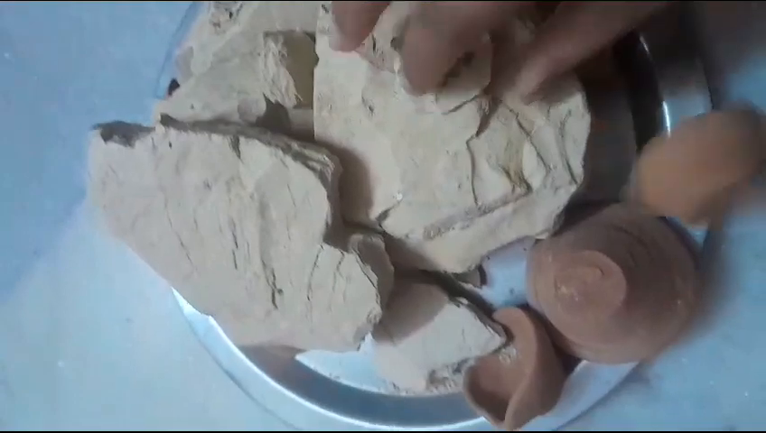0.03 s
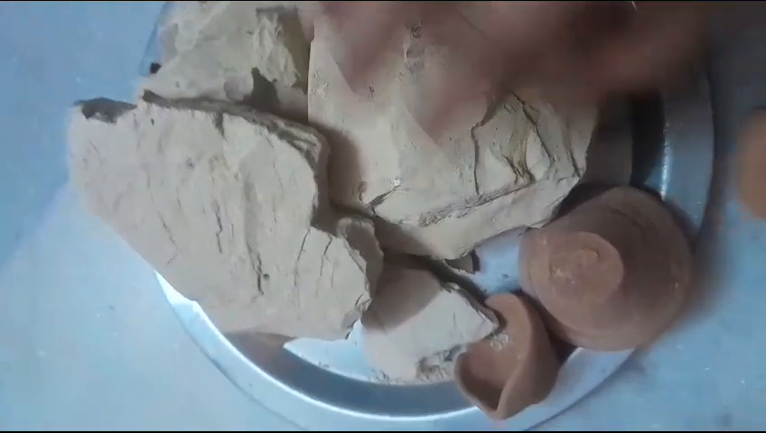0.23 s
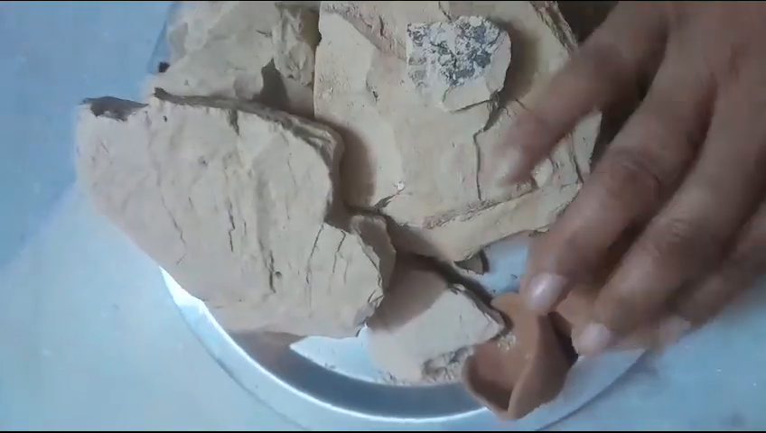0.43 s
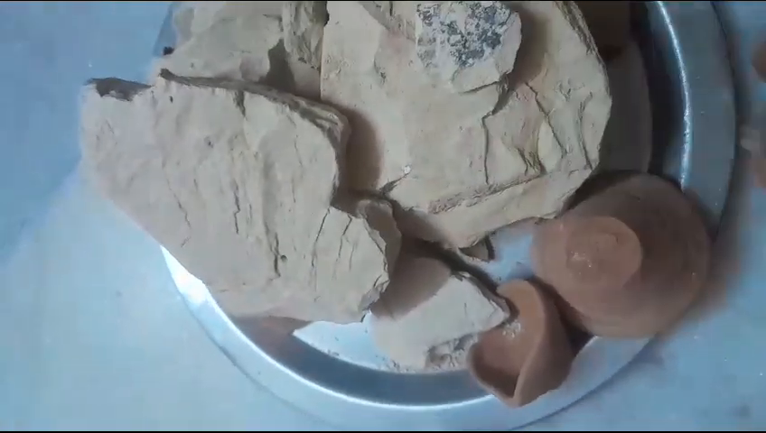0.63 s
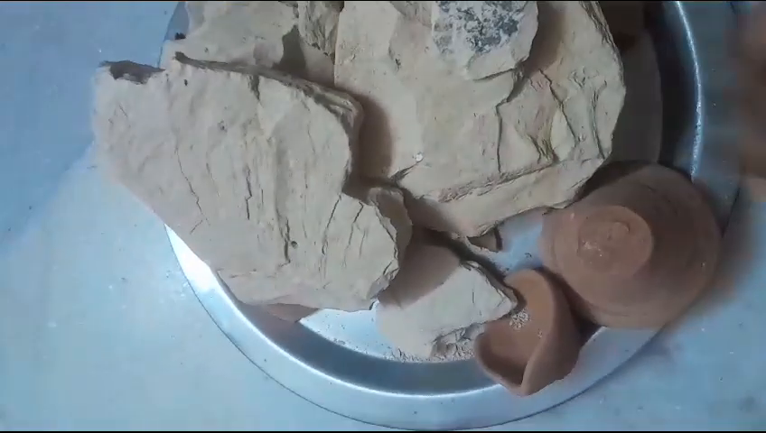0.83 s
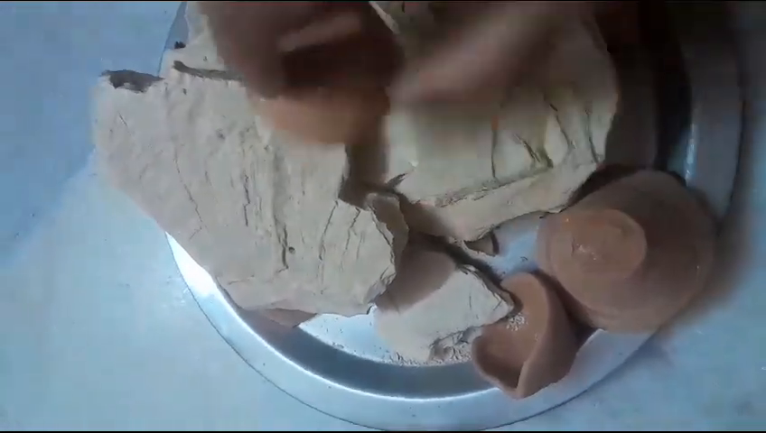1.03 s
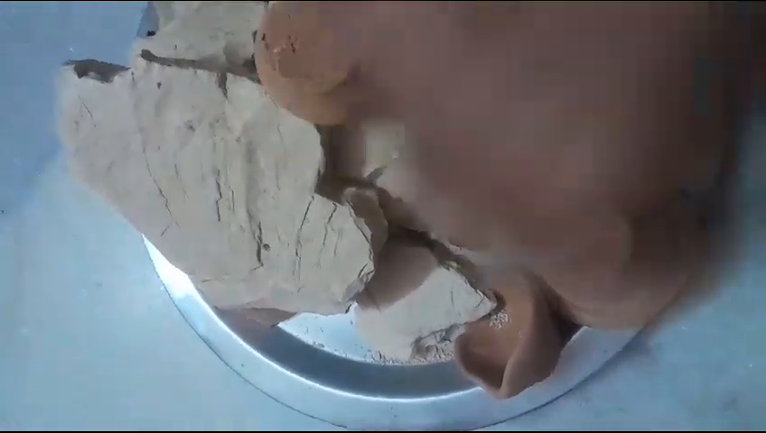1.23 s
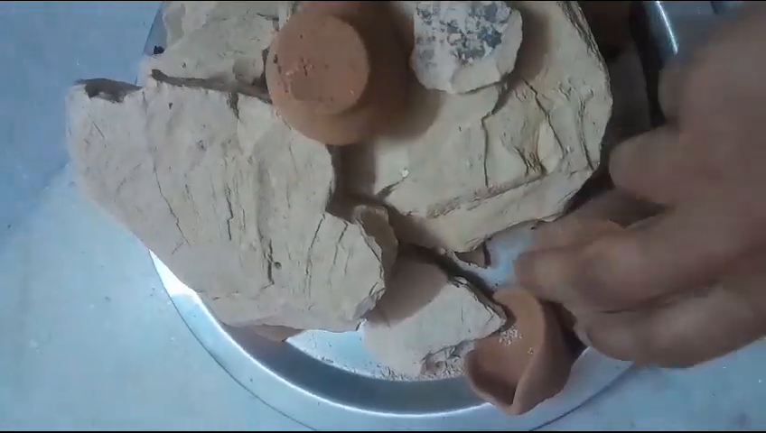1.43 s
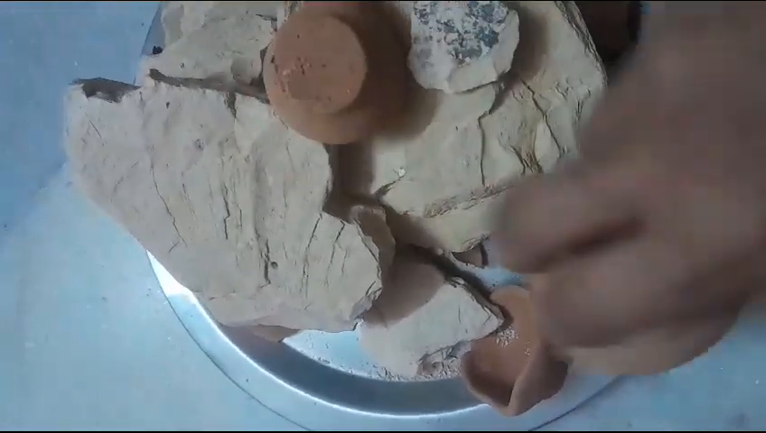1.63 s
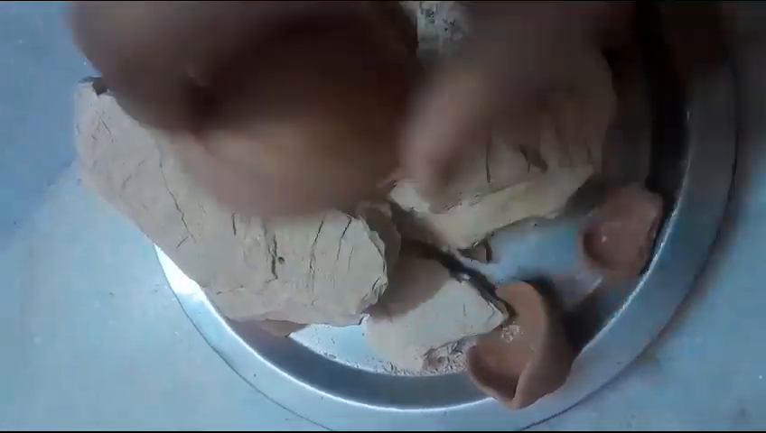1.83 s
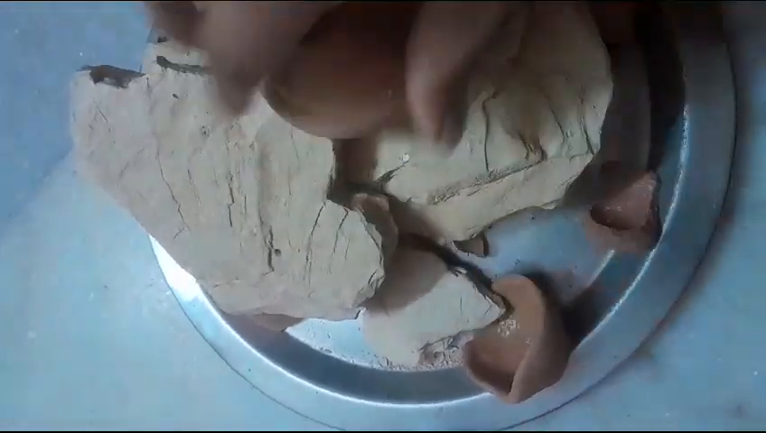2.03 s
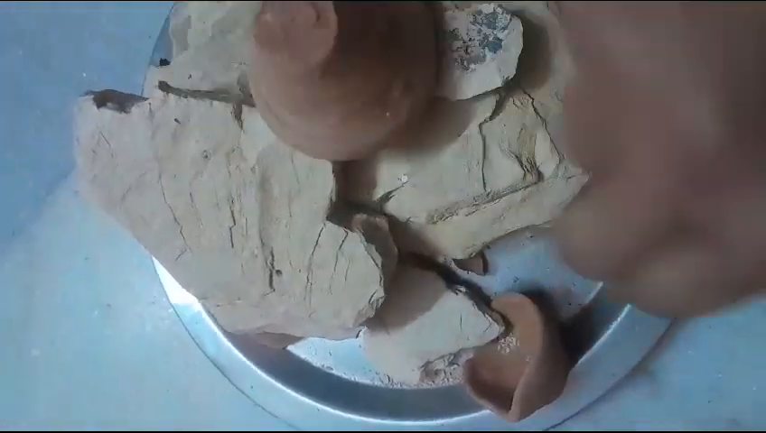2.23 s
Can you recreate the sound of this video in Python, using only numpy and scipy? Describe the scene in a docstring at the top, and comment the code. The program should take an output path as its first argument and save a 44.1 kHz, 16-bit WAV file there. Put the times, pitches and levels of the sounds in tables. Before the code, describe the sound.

Close, irregular clacks of little clay pots landing on dry clay slabs. One clinks against a steel tray rim early on; scattered taps, short scrapes and more knocks follow, with soft tray bumps and a brief hard-room echo.

```python
"""Short gritty clacks over dull thuds: small clay pots set down on dry clay slabs in a steel tray, close by.
Some knocks ring the pot, and a pot clinks as it tips against the steel rim.
Clay scrapes and rubs on clay, crumbs are crushed, and the tray bumps softly under the weight.
A bare, hard room answers over a faint low rumble."""
import sys
import numpy as np
from scipy import signal
from scipy.fft import rfft, irfft, next_fast_len
from scipy.io import wavfile

SR = 44100
rng = np.random.default_rng(int(sys.argv[2]) if len(sys.argv) > 2 else 0)


def master_out(mix):
    """Clip the mix to full scale and print it as 16-bit PCM to the path in sys.argv[1]."""
    frames = np.transpose(np.atleast_2d(mix))
    ceiling = np.clip(frames, -1, 1)
    pcm = np.round(ceiling * 32767).astype(np.int16)
    wavfile.write(sys.argv[1], SR, pcm)


N = 101429
LEAD_S, BLOW_S, REF_S = 0.2, 0.16, 0.01
BANDS_HZ = 31.25 * 2 ** (np.arange(28) / 3)
COHERENT_BELOW_HZ = 1400
# Stereo balance of the contacts: freq_hz, left_minus_right_db
BALANCE = [(100, -13.5), (300, 0), (550, -0.5), (1100, 3.5), (2200, -2), (4000, -2), (8000, 0.5),
           (14000, -3)]


def undb(db):
    """Decibels to gain."""
    return 10 ** (np.asarray(db) / 20)


def curve(points, hz):
    """Read a table on a log-frequency axis."""
    p = np.array(points)
    return np.interp(np.log(hz), np.log(p[:, 0]), p[:, 1])


def fade(t, t60_s):
    """Exponential decay."""
    return np.exp(-np.log(1000) * t / t60_s)


def unit(x):
    """Scale each channel to unit energy."""
    return x / np.sqrt(np.sum(x ** 2, axis=-1, keepdims=True) + 1e-20)


def panned(pan_db):
    """Constant-power gains; pan_db is left minus right."""
    gains = undb(np.array([[pan_db], [-pan_db]]) / 2)
    return gains / np.sqrt(np.mean(gains ** 2))


def band(hz, size, coherent_hz):
    """A third-octave of stereo noise, alike in both channels below coherent_hz."""
    bins_hz = np.fft.rfftfreq(size, 1 / SR) + 1e-3
    shape = np.cos(np.pi / 2 * np.clip(3 * np.log2(bins_hz / hz), -1, 1))
    mid, side = irfft(rfft(rng.standard_normal((2, size))) * shape, size)
    coherence = 1 / (1 + (hz / coherent_hz) ** 2)
    return np.sqrt(1 + coherence) * mid + np.sqrt(1 - coherence) * side * np.array([[1], [-1]])


def add(out, start_s, sound, level_db):
    """Mix in a sound; for unit energy, level_db is its power spread over REF_S."""
    i = int((start_s + LEAD_S) * SR)
    part = sound[:, :out.shape[1] - i]
    out[:, i:i + part.shape[1]] += part * undb(level_db) * np.sqrt(REF_S * SR)


def ring(t, modes, pan_db, roughness=0):
    """Decaying modes; grinding contact widens each by roughness times its frequency."""
    out = 0
    attack = 1 - np.exp(-t / 0.00041)
    for hz, db, t60_s in modes:
        stereo_phase = np.array([[1], [-1]]) * rng.choice([-1, 1]) * min(hz / COHERENT_BELOW_HZ, 1) * 0.6
        wander = np.cumsum(rng.standard_normal(len(t))) * np.sqrt(2 * np.pi * roughness * hz / SR)
        wave = np.sin(2 * np.pi * hz * t + stereo_phase + wander + rng.uniform(0, 2 * np.pi))
        out += undb(db) * wave * fade(t, t60_s) * attack * panned(pan_db + curve(BALANCE, hz))
    return out / np.sqrt(np.sum(out ** 2) / 2)


# Background spectrum: freq_hz, band_level_db
RUMBLE_SPECTRUM = [(30, -102), (45, -85.5), (62, -78), (85, -87.5), (125, -82), (160, -70), (200, -72.5),
                   (260, -82), (600, -92.5), (2000, -84.5), (6000, -93), (15000, -101)]
def rumble():
    """Faint steady background of the room."""
    size = next_fast_len(N)
    noise = sum(undb(curve(RUMBLE_SPECTRUM, hz)) * unit(band(hz, size, 400)) for hz in BANDS_HZ)
    return noise[:, :N] * np.sqrt(size) * panned(-5.5)


# Room tail decay: freq_hz, t60_s
TAIL_DECAY = [(150, 0.55), (500, 0.34), (1000, 0.32), (2200, 0.36), (4000, 0.26), (8000, 0.31),
              (15000, 0.29)]
# Room tail spectrum: freq_hz, gain_db
TAIL_SPECTRUM = [(150, -2.5), (500, -9), (1000, -9), (2200, -8.5), (4000, -5.5), (8000, -9), (15000, -9.5)]
def room(dry):
    """Quick reflections from tray and floor, then the diffuse tail of hard walls."""
    early_db, early_t60_s = -10.5, 0.042
    t = np.arange(SR) / SR
    tail_rise = 1 - np.exp(-t / 0.019)
    early_rise = 1 - np.exp(-(t / 0.00033) ** 2)
    response = 0
    for hz in BANDS_HZ:
        tail = unit(band(hz, SR, 730) * fade(t, curve(TAIL_DECAY, hz)) * tail_rise)
        early = unit(band(hz, SR, 1000) * fade(t, early_t60_s) * early_rise)
        width_gain = np.sqrt(0.46 * hz / SR)
        response += width_gain * (undb(curve(TAIL_SPECTRUM, hz)) * tail + undb(early_db) * early)
    return signal.fftconvolve(dry, response, axes=1)[:, :dry.shape[1]]


# Light rubs: start_s, length_s, level_db, centre_hz, width_octaves
RUBS = [(.425, .09, -64.5, 12450, .35), (1.394, 0.081, -71, 6600, .12)]
def rubs(out):
    """A pot or hand brushes dry clay: a thin friction hiss that swells and fades."""
    for start_s, length_s, level_db, centre_hz, width_octaves in RUBS:
        size = int(length_s * SR)
        bins_hz = np.fft.rfftfreq(size, 1 / SR) + 1
        shape = np.exp(-(np.log2(bins_hz / centre_hz) / width_octaves) ** 2)
        hiss = irfft(rfft(rng.standard_normal((2, size))) * shape, size)
        swell = np.sin(np.pi * np.arange(size) / size)
        add(out, start_s, unit(hiss * swell), level_db)


# Tray bumps: start_s, level_db
BUMPS = [(0.101, -60.5), (0.282, -55.5), (0.734, -61), (1.634, -58), (1.715, -61), (1.975, -55)]
def tray_bumps(out, t):
    """The tray takes the weight of a pot and sounds one low mode."""
    pitch_hz, t60_s = 64.4, 0.28
    for start_s, level_db in BUMPS:
        add(out, start_s, ring(t, [(pitch_hz, 0, t60_s)], pan_db=-0.5), level_db)


# Crushed crumbs: start_s, level_db, t60_s
CRUMBS = [(.731, -46.5, 0.13), (1.1151, -44, 0.026), (1.502, -53.5, .15), (1.523, -43, 0.35)]
# Fizz spectrum: freq_hz, band_gain_db
FIZZ_SPECTRUM = [(3000, -30.5), (6500, 6), (9500, -3), (13500, 4), (16000, -12)]
def crumbs(out, t, noise):
    """Dry crumbs break under a pot in a brief, uneven fizz."""
    spread_db, grain_s = 5.5, 0.00033
    grain_index = np.arange(len(t)) // int(grain_s * SR)
    gains = undb(curve(FIZZ_SPECTRUM, BANDS_HZ))
    for start_s, level_db, t60_s in CRUMBS:
        i = rng.integers(SR - len(t))
        fizz = sum(gain * unit(hiss[:, i:i + len(t)]) for gain, hiss in zip(gains, noise))
        grains = undb(spread_db * rng.standard_normal(len(t)))[grain_index]
        crunch = unit(fizz * grains * fade(t, t60_s))
        add(out, start_s, crunch * panned(curve(BALANCE, 12000)), level_db)


# Clay dragged over clay: start_s, length_s, end_level_db, centre_hz
SCRAPES = [(0.427, 0.033, -45, 913), (1.485, 0.041, -36, 2548), (1.681, .028, -33, 1017),
           (2.032, 0.057, -40.5, 1170)]
def scrapes(out, t, noise):
    """Grains catch and slip ever harder as a pot comes down, each a tiny knock."""
    slips_per_s, spread_db = 2700, 8
    for start_s, length_s, level_db, centre_hz in SCRAPES:
        slips = rng.random(len(t)) < slips_per_s / SR
        strength = undb(spread_db * rng.standard_normal(len(t)))
        ramp = (t < length_s) * t / length_s
        grain = knock(t, noise, centre_hz, thud_db=3.5, grit_db=-2, t60_s=0.048, pan_db=-2)
        scrape = unit(signal.fftconvolve(grain, (slips * strength * ramp)[None], axes=1))
        add(out, start_s, scrape * np.sqrt(length_s / REF_S / np.pi), level_db)


# Pot against rim: start_s, level_db, place_0_to_1, pan_db
CLINKS = [(0.2032, -17.5, 0, -8), (0.273, -39.5, 0.4, -5), (0.2786, -17, 0.8, -6), (.311, -32, 0.7, 1)]
# Clink modes: freq_hz, gain_at_place_0_db, gain_at_place_1_db, t60_s
CLINK_MODES = [(1756, -10, -9, 0.0069), (1861, -6.5, 10, 0.014), (2220, 11, 8, 0.0062),
               (2560, 3, -12.5, 0.0086), (3600, -10.5, -9, 0.031), (3773, 0, -8, 0.031),
               (7510, -18.5, -9.5, 0.004), (7680, -9, -4.5, 0.01), (7480, -5.5, 2, 0.024),
               (10920, -6, -11, 0.016), (11180, -11, -16.5, 0.011), (13770, -25.5, -8.5, 0.014),
               (14900, -8.5, -10.5, .013)]
# Steel rim modes: freq_hz, gain_db, t60_s
RIM_MODES = [(1870, -0.5, .3), (2150, -7.5, .28), (3470, 1.5, .3), (3650, -9.5, 0.26), (3880, -7.5, 0.54)]
def rim_clinks(out, t, long_t, noise):
    """A hard tick and bright modes mixed by the place of contact; the rim rings on faintly."""
    tick_db, rim_db = -14, -19
    for start_s, level_db, place, pan_db in CLINKS:
        modes = [(hz, db0 + (db1 - db0) * place, t60_s) for hz, db0, db1, t60_s in CLINK_MODES]
        tick = knock(t, noise, clack_hz=2210, thud_db=1.5, grit_db=10, t60_s=0.0099, pan_db=pan_db)
        clink = ring(t, modes, pan_db, roughness=0.0096) + undb(tick_db) * tick
        add(out, start_s, clink, level_db)
        add(out, start_s, ring(long_t, RIM_MODES, pan_db), level_db + rim_db)


# Blows that ring a pot: start_s, pitch_hz, level_db, t60_s, pan_db
POT_RINGS = [(0.4788, 3516, -53.5, 0.026, 0), (0.8091, 3360, -39, 0.009, 1),
             (1.1153, 2292, -20.5, 0.051, -2), (1.52, 498, -38, 0.09, 2), (1.521, 1880, -24.5, 0.072, 1),
             (1.6339, 1055, -29.5, 0.18, 3.5), (1.7133, 539, -25, 0.054, 3),
             (1.72, 818, -26.5, 0.036, -3.5), (1.772, 972, -25.5, 0.065, -0.5),
             (1.969, 2103, -18.5, 0.0064, -0.5), (1.9736, 1555, -17, 0.019, 0.5),
             (1.975, 2344, -21, 0.009, -2.5)]
# Pot modes: pitch_ratio, gain_db, t60_ratio
POT_MODES = [(1, 2, 0.78), (1.06, -2.5, 0.25), (1.17, -2.5, 0.8), (1.72, -13, 0.64), (3.02, -27.5, 0.4)]
def pot_rings(out, t):
    """A struck pot rings briefly in inharmonic modes."""
    for start_s, pitch_hz, level_db, t60_s, pan_db in POT_RINGS:
        modes = [(pitch_hz * ratio, db, t60_s * t60_ratio) for ratio, db, t60_ratio in POT_MODES]
        add(out, start_s, ring(t, modes, pan_db, roughness=0.0074), level_db)


# Clay-on-clay spectrum: freq_hz, band_gain_db
CLAY_SPECTRUM = [(30, -59.5), (80, -45), (150, -26.5), (280, -19), (420, -9.5), (700, -6.5), (1100, 0),
                 (1400, -0.5), (2400, 2.5), (3700, -1.5), (5000, -5.5), (7300, -4), (9200, -29),
                 (13500, -18), (16000, -32)]
def knock(t, noise, clack_hz, thud_db, grit_db, t60_s, pan_db):
    """Dense, damped modes of slabs and tray: thud below, clack in the middle, grit on top."""
    clack_db, clack_octaves, thud_hz, grit_hz, scatter_db = 9, 0.46, 790, 4800, 2.5
    spectrum_db = curve(CLAY_SPECTRUM, BANDS_HZ)
    spectrum_db += clack_db * np.exp(-(np.log2(BANDS_HZ / clack_hz) / clack_octaves) ** 2)
    spectrum_db += thud_db / (1 + (BANDS_HZ / thud_hz) ** 4)
    spectrum_db += grit_db / (1 + (grit_hz / BANDS_HZ) ** 4)
    spectrum_db += scatter_db * rng.standard_normal(len(BANDS_HZ))
    out, i = 0, rng.integers(SR - len(t))
    for hz, gain, modes in zip(BANDS_HZ, unit(undb(spectrum_db)), noise):
        rise_s = 0.86 / hz + 0.013 * t60_s  # low bands and long, soft contacts build slowly
        attack = 1 - np.exp(-(t / rise_s) ** 2)
        decay = fade(t, t60_s * max(2 * thud_hz / hz, 1) ** 0.16)  # low bands last longer
        out += gain * unit(modes[:, i:i + len(t)] * attack * decay) * panned(pan_db + curve(BALANCE, hz))
    return out


# Knocks and rebounds: start_s, level_db, clack_hz, thud_db, grit_db, t60_s, pan_db
KNOCKS = [(-.07, -24.5, 1390, 7, 3.5, 0.055, -2.5), (0.1008, -19, 1300, 2.5, 3.5, 0.029, -1.5),
          (.1016, -15.5, 2960, -4, -1, .011, -3), (0.1065, -15.5, 1020, -9.5, 4.5, 0.09, -2),
          (.112, -21, 3470, -2.5, 6, 0.16, -4), (.117, -17, 1040, -6.5, 1, 0.098, 1.5),
          (.137, -23.5, 3080, -18.5, 11.5, 0.18, -1.5), (0.172, -23, 3800, -21.5, 6, 0.021, -6),
          (0.181, -21.5, 1330, 4.5, -0.5, 0.058, 0.5), (0.217, -21, 2550, -7.5, 5.5, 0.097, 0),
          (.2178, -21, 900, 3, 0.5, 0.042, -1), (0.232, -29.5, 3200, -19, 10, 0.051, -1.5),
          (.297, -34, 1920, -10, 8, 0.13, -0.5), (0.3247, -33.5, 1930, -5, 5, 0.031, -2),
          (0.4715, -40, 1700, 9, -4.5, 0.032, -3), (.727, -39.5, 1200, 8.5, 3, 0.058, 2.5),
          (.733, -31.5, 1240, -3.5, 1, 0.13, -2), (0.737, -33, 3530, -8, 5.5, 0.0073, -11),
          (0.759, -37, 1660, -6, -2, 0.093, -6), (0.8007, -34, 1790, 0, 8.5, 0.025, -2),
          (0.8093, -32, 3660, -1.5, -6, 0.015, -3), (1.1122, -34, 1700, 3, 5, 0.051, 0.5),
          (1.116, -24, 2600, -12.5, -1.5, 0.04, -2.5), (1.128, -35, 1060, 16, -3, 0.05, 0),
          (1.208, -42.5, 3095, -8, -8, 0.01, -1), (1.5178, -26, 1500, -11.5, -4.5, 0.038, -1.5),
          (1.5235, -27, 2940, -1, 2.5, 0.062, 0.5), (1.538, -35, 1220, 8.5, 9, 0.082, -2),
          (1.567, -32, 1390, -9.5, -14.5, 0.055, -3.5), (1.6326, -23.5, 2160, -18.5, -5, 0.032, -2.5),
          (1.6376, -24.5, 3170, -6.5, -3, 0.027, -2), (1.675, -44.5, 6500, 7, 1, 0.017, 2.5),
          (1.7128, -18.5, 850, -1.5, -1.5, 0.072, -1), (1.732, -32, 735, 0, 5.5, 0.053, -2.5),
          (1.7708, -18.5, 2580, -17.5, -1.5, 0.017, -4.5), (1.7731, -21, 980, -6, 3.5, 0.026, -1),
          (1.817, -40, 1130, 17.5, -9, 0.02, -2.5), (1.856, -38.5, 990, 4.5, -7, 0.033, -1.5),
          (1.9577, -28, 1070, -9.5, -3.5, 0.074, 2.5), (1.97, -25, 2190, -1, 18.5, 0.0093, -1.5),
          (1.973, -18, 1916, 9.5, 14.5, 0.026, -1.5), (1.979, -28.5, 593, 11, 6.5, 0.063, -1.5),
          (1.989, -21.5, 1110, 9, -23, 0.021, -1), (2.099, -42, 800, -3, -12, 0.039, -1)]
def slab_knocks(out, t, noise):
    """Pots land and rebound on the slabs."""
    for start_s, level_db, *contact in KNOCKS:
        add(out, start_s, knock(t, noise, *contact), level_db)


def scene():
    """Clay, tray and rim in the room, over the rumble."""
    clay, rim, tray = np.zeros((3, 2, N + int(LEAD_S * SR)))
    t = np.arange(int(BLOW_S * SR)) / SR
    long_t = np.arange(SR) / SR
    noise = [band(hz, SR, COHERENT_BELOW_HZ) for hz in BANDS_HZ]
    slab_knocks(clay, t, noise)
    pot_rings(clay, t)
    scrapes(clay, t, noise)
    rubs(clay)
    crumbs(clay, t, noise)
    tray_bumps(tray, long_t)
    rim_clinks(rim, t, long_t, noise)
    # The clay sounds carry no deep bass; the tray's low mode joins them afterwards.
    body = signal.sosfilt(signal.butter(2, 170, "high", fs=SR, output="sos"), clay) + tray
    # The close clinks reach the room less, their treble least.
    rim_send = undb(-1.5) * signal.sosfilt(signal.butter(1, 5500, fs=SR, output="sos"), rim)
    return (body + rim + room(body + rim_send))[:, -N:] + rumble()


def record(dry):
    """Round peaks near full scale and cut the top."""
    ceiling, top_hz = 0.95, 15800
    rounded = dry / (1 + (dry / ceiling) ** 8) ** (1 / 8)
    return signal.sosfilt(signal.ellip(8, 0.2, 80, top_hz, fs=SR, output="sos"), rounded)


dry = scene()
out = record(dry)
master_out(out)
```